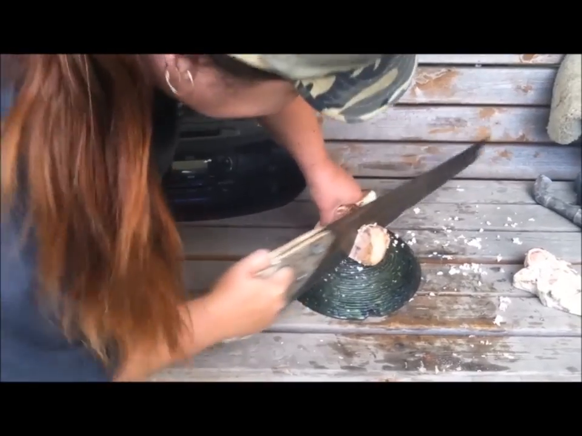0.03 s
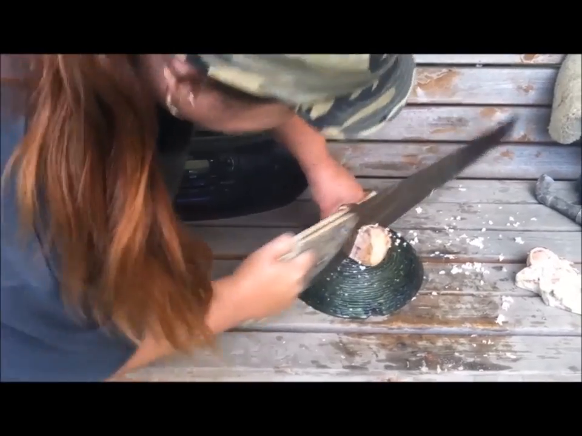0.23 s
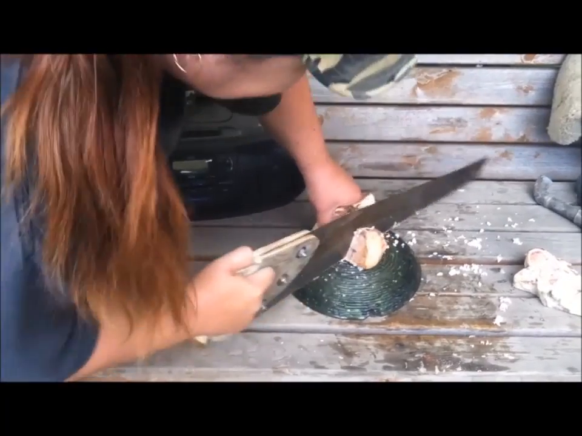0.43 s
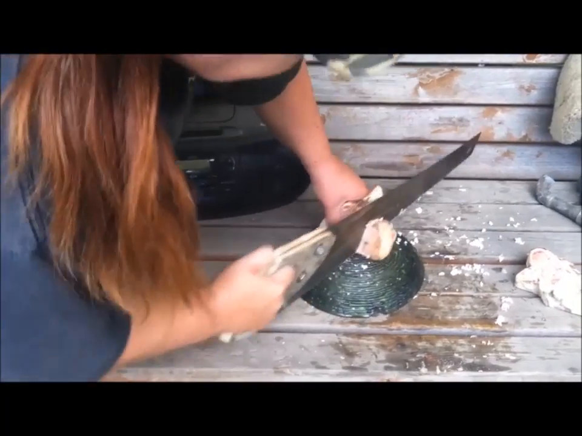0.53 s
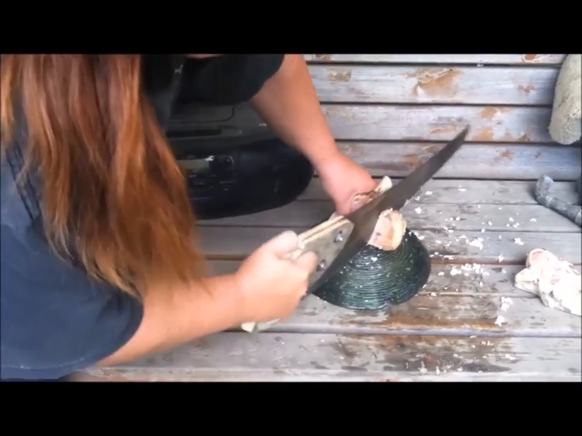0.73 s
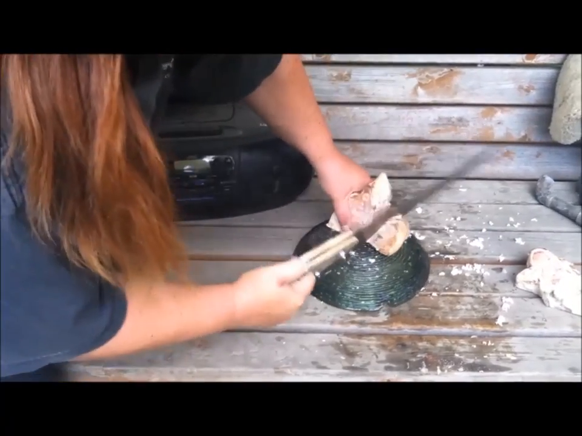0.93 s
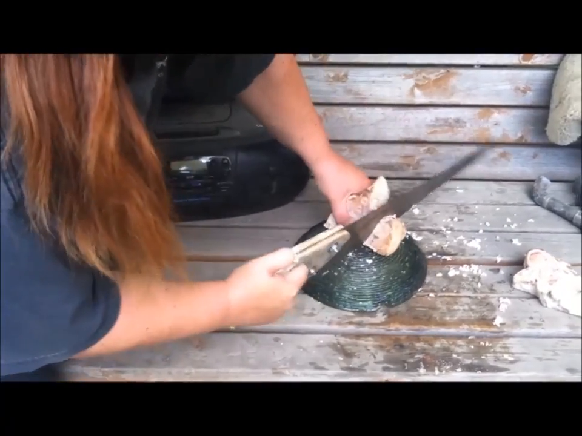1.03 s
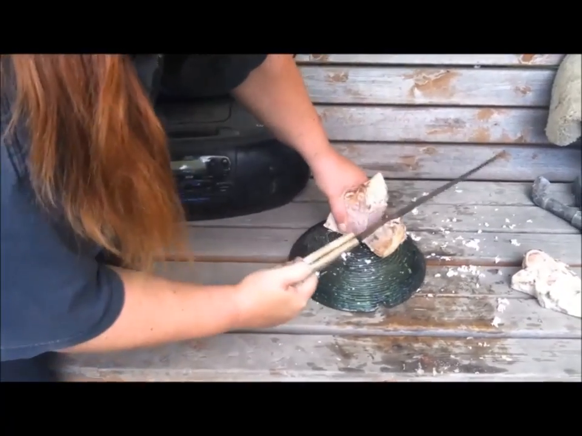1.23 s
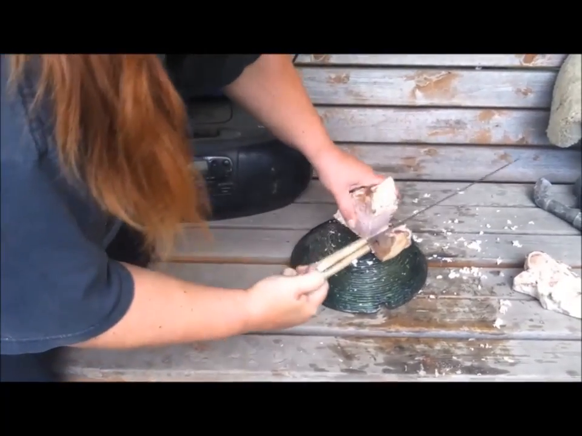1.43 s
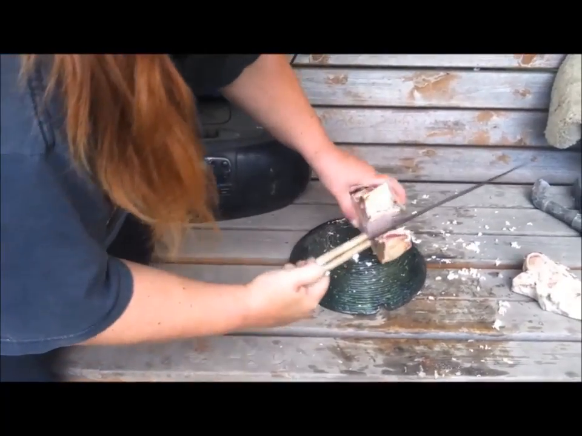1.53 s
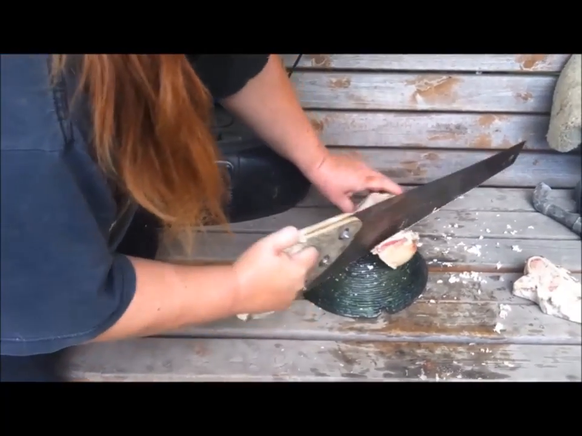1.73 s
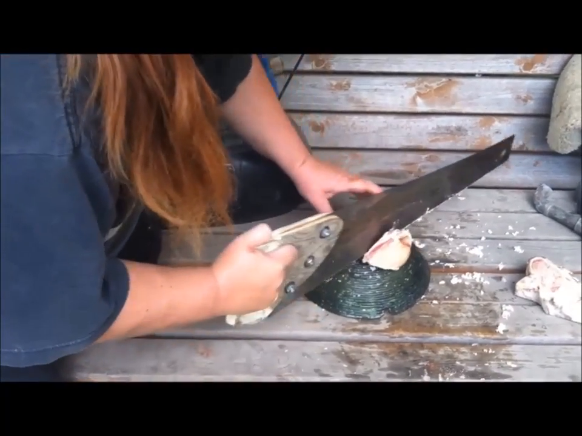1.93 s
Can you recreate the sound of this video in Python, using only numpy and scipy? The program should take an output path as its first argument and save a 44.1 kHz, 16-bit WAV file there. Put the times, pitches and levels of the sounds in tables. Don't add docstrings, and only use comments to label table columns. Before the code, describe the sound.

Coarse saw strokes and knocks on wooden boards, then a loud bone snap and faint scrape

```python
import sys
import numpy as np
from scipy import signal
from scipy.fft import rfft, irfft
from scipy.io import wavfile
from scipy.ndimage import uniform_filter1d

SR = 44100
rng = np.random.default_rng(int(sys.argv[2]) if len(sys.argv) > 2 else 0)


def attenuation_scalar(level_db):
    decades = np.asarray(level_db, float) / 20
    return 10 ** decades


def pcm_store(signal):
    levels = np.round(np.clip(np.atleast_2d(signal), -1, 1) * 32767)
    wavfile.write(sys.argv[1], SR, levels.astype(np.int16).T)


N = 85995

# time in seconds, rasp level in dB, force into the bench in dB.
STROKES = [
    [(0.0, -41, -30.5), (0.01, -35, -49.5), (0.026, -36, -32), (0.032, -34, -31.5), (0.086, -37, -40.5),
     (0.13, -62, -37.5), (0.158, -60, -43.5), (0.17, -52, -40)],
    [(0.17, -60, -50), (0.174, -60.5, -41.5), (0.226, -27.5, -18), (0.244, -28, -22), (0.278, -31, -17.5),
     (0.298, -26.5, -13), (0.324, -28.5, -12), (0.376, -49.5, -36.5), (0.395, -48, -51)],
    [(0.395, -55, -42), (0.417, -40, -39.5), (0.445, -31.5, -34.5), (0.457, -34.5, -29.5),
     (0.491, -39.5, -32), (0.505, -40, -38), (0.545, -45, -44), (0.569, -68, -30), (0.62, -78, -61)],
    [(0.62, -80, -61), (0.67, -104, -32.5), (0.692, -51.5, -31.5), (0.72, -57.5, -28.5),
     (0.808, -60.5, -62.5), (0.836, -59.5, -46), (0.948, -89.5, -75), (0.986, -71, -50), (1.02, -70.5, -84)],
]
ALL_STROKES = np.concatenate([np.array(rows)[:-1] for rows in STROKES] + [np.array(STROKES[-1])[-1:]])
# time in seconds, lift of the high hiss in dB.
BITE = [(0.0, 1), (0.04, 1.5), (0.1, -4.5), (0.18, 1.5), (0.205, 7), (0.23, 2.5), (0.28, 0.5), (0.336, -6),
        (0.36, -10), (0.4, -2), (0.43, -2), (0.5, 1), (0.55, -5), (0.68, -3), (0.72, -5), (1.02, -2)]
# centre in Hz, width in Hz, level in dB.
BRIGHT_HUMPS = [(1720, 4400, -5.5), (3687, 173, 3.5), (4220, 200, -4), (7000, 2260, -2.5),
                (10810, 1670, -2.5), (13160, 1200, 0), (14740, 1600, -3)]
# centre in Hz, width in Hz, level in dB.
BONE_BODY = [(856, 97, 2), (1102, 59, 0.5), (1300, 56, 5.5), (1518, 83, 4), (1756, 85, 4.5),
             (1877, 100, 3.5), (2285, 1500, -6)]
# pitch in Hz, level in dB, decay by 60 dB in seconds.
BENCH_MODES = [(195, -21, .05), (240, -15, .06), (275, -12, .06), (328, -10, .05), (510, -9, .07),
               (550, 1, .085), (588, -1, .08), (655, -7, .07), (740, -14, .04), (840, -10, .06),
               (975, -13, .04), (1190, -13, .04), (1380, -14, .03), (1650, -19, .02)]
# start in seconds, peak in dB,
# low-board level in dB, brightness in dB per octave.
KNOCKS = [(0.028, -22, -30, -37), (0.117, -44, 2, -1), (0.151, -28.5, -10, -23), (0.197, -30.5, 7, 15.5),
          (0.237, -16.5, 5.5, 14), (0.285, -10, -21, 9), (0.301, -9.5, -13, 0), (0.312, -12, 1, 2.5),
          (0.3205, -7, 3.5, 2), (0.333, -15, 12.5, 4), (0.343, -24, -24, 25), (0.418, -35.5, -23, 12),
          (0.456, -22, 5, 8), (0.485, -31, -19, -19), (0.51, -34, 26, 7), (0.53, -32, 29, -5),
          (0.562, -20, 1.5, 6), (0.587, -45, 3, 18), (0.642, -36, 11, -14), (0.662, -29, 14, -6),
          (0.689, -27.5, -6, -19), (0.697, -25.5, 12, -10.5), (0.707, -21, -7, -5), (0.721, -25, 5, -3),
          (0.734, -32, -5, 8.5), (0.744, -43, 10, 0), (0.834, -41.5, 12, 13.5), (0.982, -48.5, 32, -5),
          (1.567, -51, 3, -8.5), (1.663, -57, -2.5, 18)]
# frequency in Hz, level in dB per Hz.
AIR_SPECTRUM = [(15, -40), (30, -35), (60, -17), (110, -7.5), (160, -5.5), (640, -5.5), (2080, -9.5),
                (16000, -21)]
# start in seconds, level in dB, decay by 60 dB in seconds.
TICKS = [(0.1705, -37, .03), (0.688, -39.5, .07), (0.739, -41, .015), (1.4017, -49, .03),
         (1.424, -53.5, .03), (1.767, -62, 0.042), (1.907, -66, .02)]
# start in seconds, level in dB, length in seconds.
JOLTS = [(0.18, -55, 0.023), (0.205, -49, 0.017), (0.325, -43, 0.017), (0.567, -58.5, 0.022),
         (1.065, -63, 0.018), (1.135, -78, 0.035)]
# start in seconds, peak in dB, centre in Hz.
CHIPS = [(0.183, -43, 7000), (0.1905, -38, 12000), (0.2123, -26, 11100), (0.2215, -20, 11500),
         (0.2859, -15, 5500), (0.2978, -14, 5000), (0.308, -18.5, 4130), (0.3164, -18, 11700),
         (0.32, -12.5, 3700), (0.337, -28, 11000), (0.4145, -48, 9000), (0.441, -41, 8000),
         (0.4865, -34, 7000), (0.5064, -41, 4950), (0.5298, -46, 4000), (0.563, -43, 4200),
         (0.71, -39, 3500)]
# start in seconds, peak in dB, low part relative to it in dB.
SNAPS = [
    (1.0682, -26, -10),
    (1.0706, -5, -14),
    (1.0757, -1, -10),
    (1.081, -22, 11),
    (1.1148, -24, -10),
]
# centre in Hz, width in Hz, level in dB.
CRACK_HUMPS = [(3700, 500, 1), (4300, 500, -3), (7600, 1500, -6), (10400, 1400, 0), (13400, 900, 0),
               (15100, 1000, 2)]
# centre in Hz, width in Hz, level in dB.
SNAP_LOW = [(615, 35, 3), (775, 30, 0), (930, 40, -9), (1175, 28, 0), (1700, 100, -10), (2270, 90, -4),
            (2740, 35, -1), (380, 80, -14)]
# time in seconds, scuff level in dB, hiss level in dB.
SCRAPE = [(1.755, -72, -72), (1.768, -58, -61), (1.79, -61, -67), (1.808, -46, -55), (1.838, -54, -63),
          (1.85, -49, -63), (1.886, -60, -76), (1.92, -70, -74), (1.95, -60, -79)]
# frequency in Hz, level in dB per Hz.
SCRAPE_SPECTRUM = [(120, -48), (250, -15.5), (600, -10.5), (1040, -6), (1900, -10.5), (2600, -20.5),
                   (4000, -21), (16000, -41.5)]
# centre in Hz, width in Hz, depth 0 to 1.
HOLLOWS = [(425, 110, 0.85), (2500, 1400, .5), (5200, 600, 0.7), (9520, 420, 0.8), (12250, 420, .8)]
LOW_CUT_HZ = 175


def evened(x):
    return x / np.sqrt(np.mean(x ** 2) + 1e-20)


def curve(rows, column):
    rows = np.asarray(rows)
    return attenuation_scalar(np.interp(np.arange(N) / SR, rows[:, 0], rows[:, column], left=-140, right=-140))


def add(mix, s, sound):
    part = mix[round(s * SR):][:len(sound)]
    part += sound[:len(part)]


def high_pass(x, order, hz):
    return signal.sosfilt(signal.butter(order, hz, "high", fs=SR, output="sos"), x)


def resonate(x, hz, width):
    r, w = np.exp(-np.pi * width / SR), 2 * np.pi * hz / SR
    gain = (1 - r * r) / 2
    return signal.lfilter([gain, 0, -gain], [1, -2 * r * np.cos(w), r * r], x)


def humped(x, humps):
    return sum((-1) ** k * attenuation_scalar(db) * resonate(x, hz, width) for k, (hz, width, db) in enumerate(humps))


def coloured(x, spectrum):
    points_hz, points_db = np.transpose(spectrum)
    hz = np.fft.rfftfreq(len(x), 1 / SR)
    gain = attenuation_scalar(np.interp(np.log(hz + 1), np.log(points_hz + 1), points_db))
    return evened(irfft(rfft(x) * gain, len(x)))


def grains(per_s, spread_db):
    happens = rng.random(N) < per_s / SR
    size = attenuation_scalar(spread_db * np.minimum(rng.exponential(1, N), 4))
    return evened(happens * rng.choice([-1., 1.], N) * size)


def flutter(samples):
    return evened(uniform_filter1d(rng.standard_normal(N), size=samples))


def burst(t60, size=6000):
    return rng.standard_normal(size) * attenuation_scalar(-60 * np.arange(size) / SR / t60)


def rasp():
    chatter_db = 0.9 * flutter(110)
    teeth = grains(per_s=4000, spread_db=2.3)
    bite = attenuation_scalar(np.interp(np.arange(N) / SR, *np.transpose(BITE)))
    coarse, fine = humped(teeth, BRIGHT_HUMPS[:4]), humped(teeth, BRIGHT_HUMPS[4:])
    teeth = (coarse + bite * fine) / np.std(coarse + fine)
    return teeth * curve(ALL_STROKES, column=1) * attenuation_scalar(-1.5 + chatter_db)


def grind():
    by_speed = 0.65
    speed, force = curve(ALL_STROKES, column=1), curve(ALL_STROKES, column=2)
    hum = evened(humped(grains(per_s=2700, spread_db=3.2), BONE_BODY))
    return hum * speed ** by_speed * force ** (1 - by_speed) * attenuation_scalar(-4.5)


def ring(spot, tilt_db=0):
    detune, spread_db = 0.02, 2.0
    t = np.arange(6000) / SR
    hz, db, t60 = np.transpose(BENCH_MODES)[:, :, None]
    hz = hz * (1 + detune * spot[0][:, None])
    level_db = db + (tilt_db + spread_db * spot[1])[:, None]
    return (attenuation_scalar(level_db - 60 * t / t60) * np.sin(2 * np.pi * hz * t)).sum(0)


def slips():
    out = np.zeros(N)
    for spot in rng.uniform(-1, 1, (6, 2, len(BENCH_MODES))):
        modes = ring(spot)
        pushes = grains(per_s=1500 / 6, spread_db=2.5) * curve(ALL_STROKES, column=2)
        out += signal.oaconvolve(pushes, modes / np.linalg.norm(modes))[:N] * attenuation_scalar(-12.5)
    return out


def knocks():
    out = np.zeros(N)
    octaves = np.log2(np.array(BENCH_MODES)[:, 0] / 580)
    rise = np.minimum(np.arange(6000) / SR / 0.0021, 1)
    spots = rng.uniform(-1, 1, (len(KNOCKS), 2, len(BENCH_MODES)))
    for (s, db, low_db, bright_db), spot in zip(KNOCKS, spots):
        tilt_db = low_db * (octaves < -.5) + bright_db * np.maximum(octaves, 0)
        knock = ring(spot, tilt_db) * rise
        add(out, s - .001, attenuation_scalar(db + 0.5) * knock / abs(knock).max())
    return out


def bench():
    wood = slips() + knocks()
    tail = burst(t60=0.04, size=9000)
    wood = wood + attenuation_scalar(-12) * signal.oaconvolve(wood, tail / np.linalg.norm(tail))[:N]
    return high_pass(wood, 6, LOW_CUT_HZ)


def air():
    flicker_db = 0.62 * flutter(900)
    return coloured(rng.standard_normal(N), AIR_SPECTRUM) * attenuation_scalar(-60 + flicker_db)


def ticks():
    out = np.zeros(N)
    for s, db, t60 in TICKS:
        add(out, s, attenuation_scalar(db) * burst(t60))
    return resonate(out, 14000, 3000)


def jolts():
    out = np.zeros(N)
    for s, db, length in JOLTS:
        u = np.arange(0, length, 1 / SR) / length
        add(out, s, attenuation_scalar(db) * np.sin(2 * np.pi * u) * np.sin(np.pi * u))
    return out


def chips():
    out = np.zeros(N)
    for s, db, hz in CHIPS:
        add(out, s, attenuation_scalar(db - 0.5) * resonate(burst(t60=0.02), hz, 0.76 * hz))
    return out


def snap():
    crack_t60 = 0.0055
    crack, high, low = np.zeros((3, N))
    for s, db, low_db in SNAPS:
        add(crack, s, attenuation_scalar(db) * burst(crack_t60))
        add(low, s, attenuation_scalar(db + low_db + 9.0) * burst(2 * crack_t60))
    rise = np.minimum(np.arange(12000) / (0.0012 * SR), 1)
    break_s = SNAPS[1][0]
    add(high, break_s, rise * attenuation_scalar(-16) * burst(t60=0.17, size=12000))
    add(low, break_s, rise * attenuation_scalar(-15) * burst(t60=0.18, size=12000))
    settle = attenuation_scalar(-300 * np.maximum(np.arange(N) / SR - 1.135, 0))
    low = humped(low * settle, [(hz, 2 * width, db) for hz, width, db in SNAP_LOW])
    return humped(crack, CRACK_HUMPS) + humped(high * settle, BRIGHT_HUMPS) + high_pass(low, 4, 300)


def scrape():
    lumps_db = 2.0 * flutter(150)
    scuff = coloured(grains(per_s=6000, spread_db=2.0), SCRAPE_SPECTRUM) * attenuation_scalar(lumps_db)
    hiss = evened(humped(grains(per_s=7000, spread_db=2.0), BRIGHT_HUMPS[1:]))
    return scuff * curve(SCRAPE, column=1) + hiss * curve(SCRAPE, column=2)


def scene():
    near = rasp() + grind() + bench() + ticks() + chips() + snap() + scrape()
    for hz, width, depth in HOLLOWS:
        near = near - depth * resonate(near, hz, width)
    near = high_pass(near, 4, LOW_CUT_HZ)
    return (near + jolts() + air())[None]


def roll_off(x):
    return signal.sosfilt(signal.butter(12, 16970, fs=SR, output="sos"), x)


def record(dry):
    edge = signal.firwin(511, 15850, window=("kaiser", 9), fs=SR)
    mix = signal.oaconvolve(dry, edge[None], "same")
    return roll_off(mix)


dry = scene()
out = record(dry)
pcm_store(out)
```